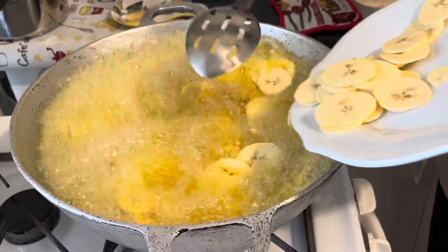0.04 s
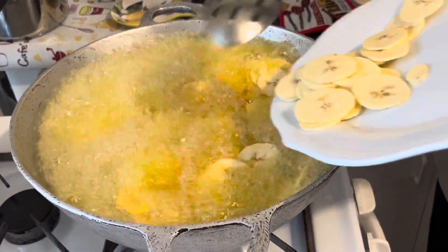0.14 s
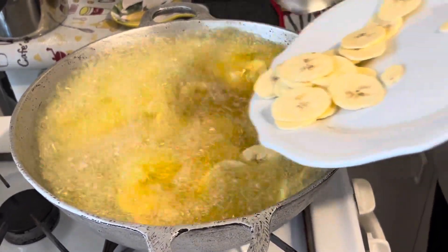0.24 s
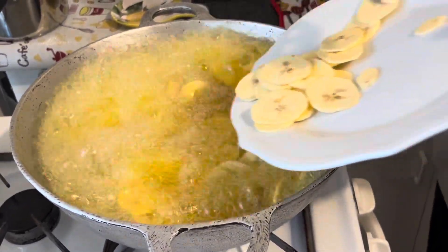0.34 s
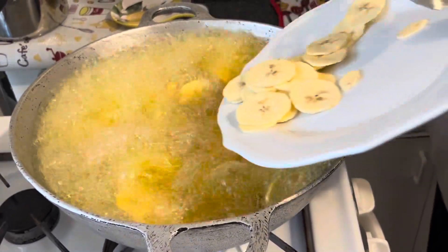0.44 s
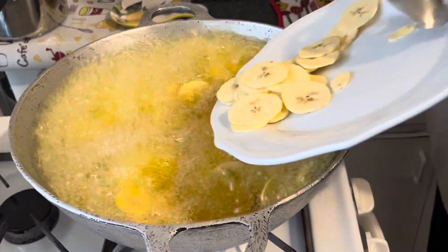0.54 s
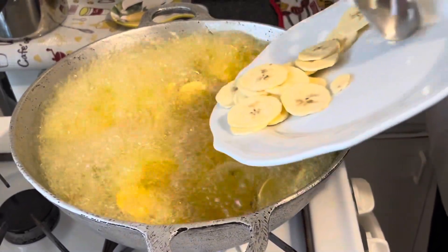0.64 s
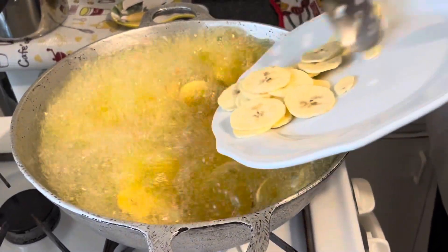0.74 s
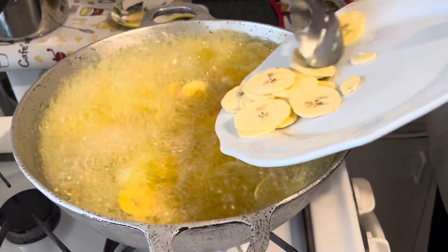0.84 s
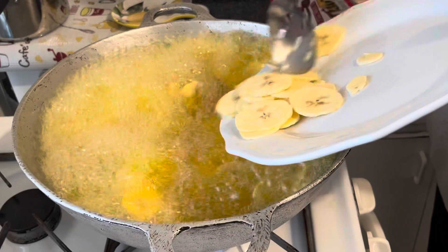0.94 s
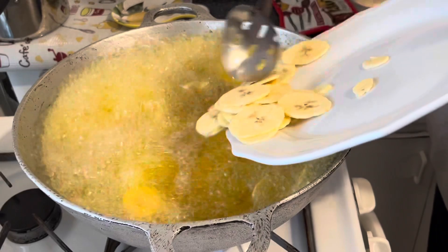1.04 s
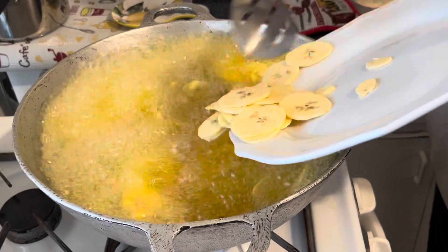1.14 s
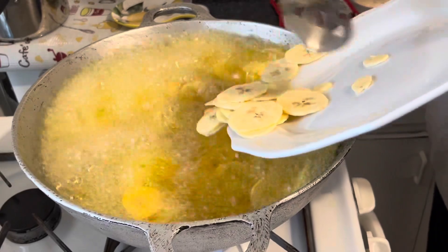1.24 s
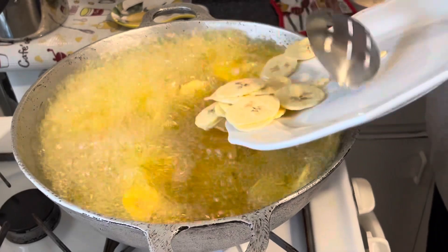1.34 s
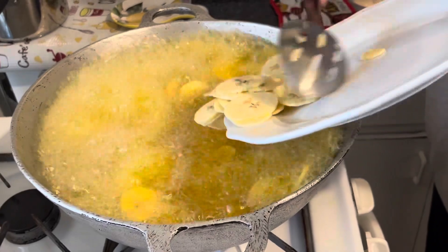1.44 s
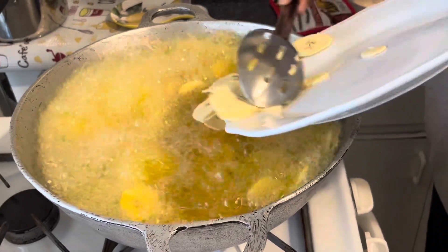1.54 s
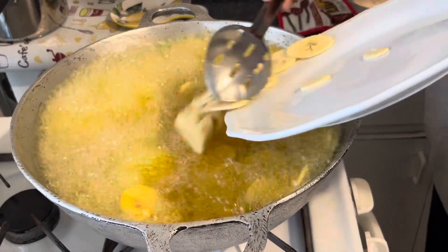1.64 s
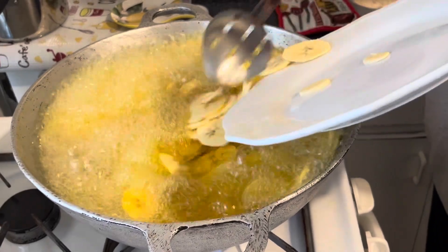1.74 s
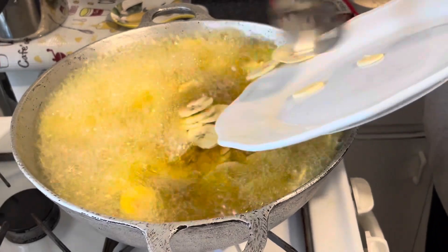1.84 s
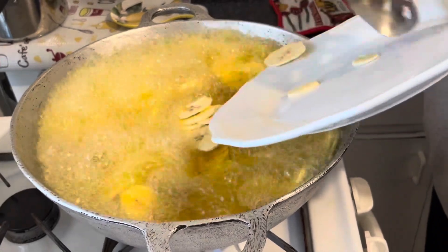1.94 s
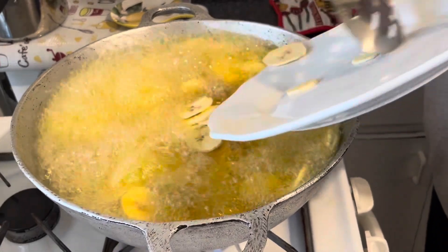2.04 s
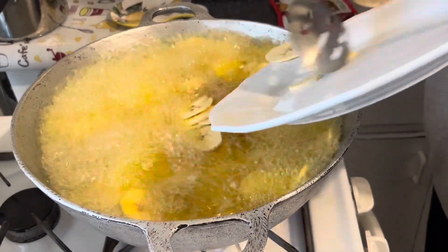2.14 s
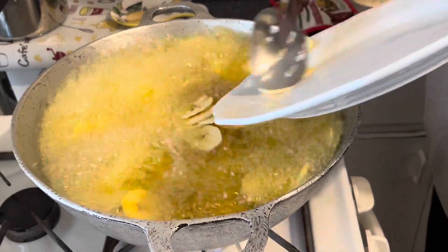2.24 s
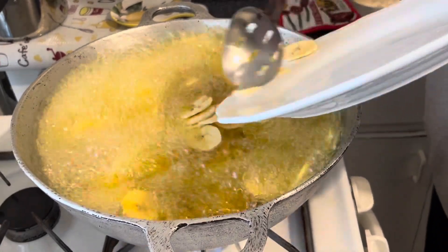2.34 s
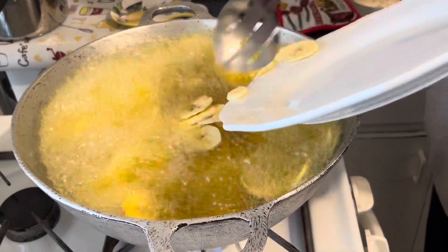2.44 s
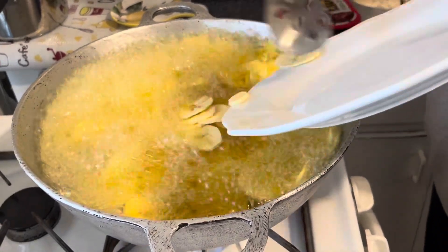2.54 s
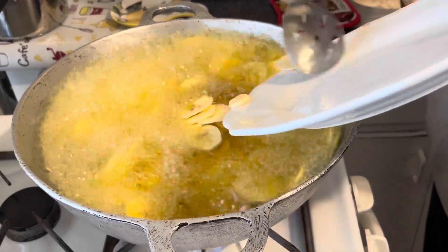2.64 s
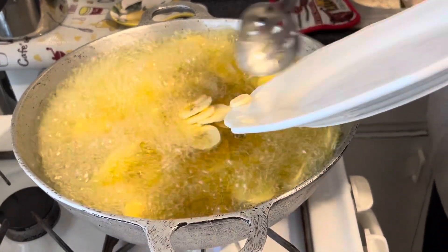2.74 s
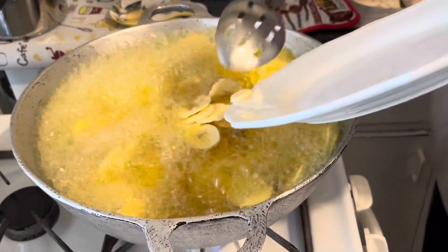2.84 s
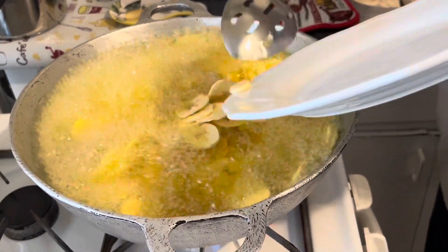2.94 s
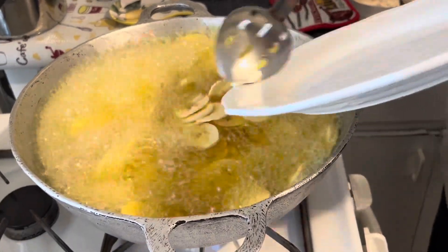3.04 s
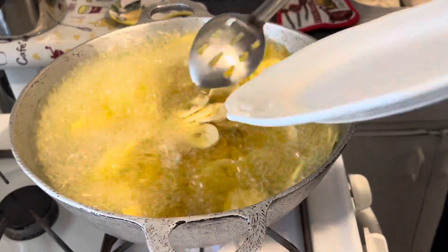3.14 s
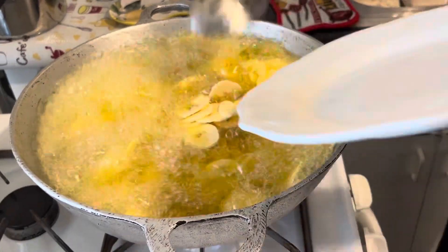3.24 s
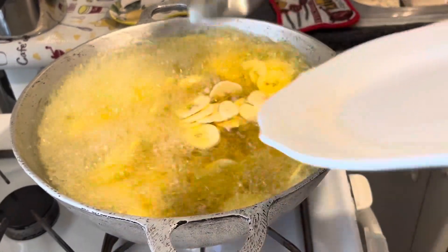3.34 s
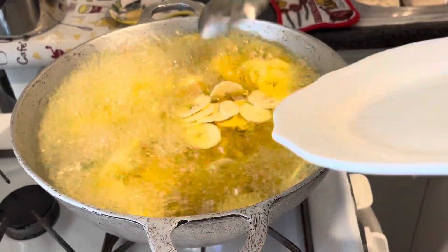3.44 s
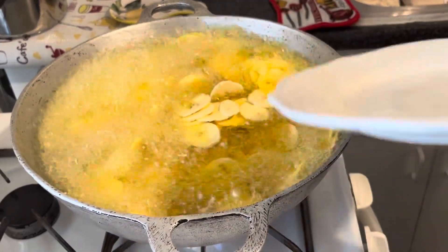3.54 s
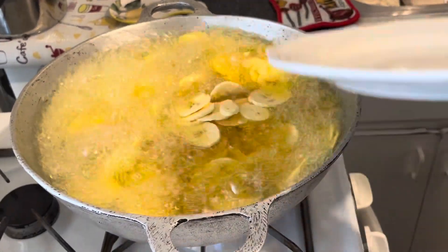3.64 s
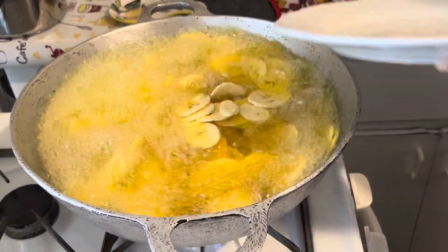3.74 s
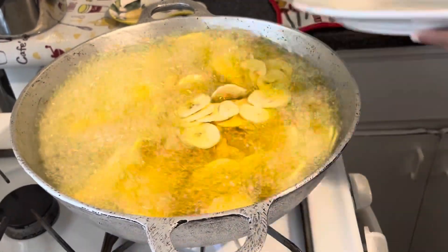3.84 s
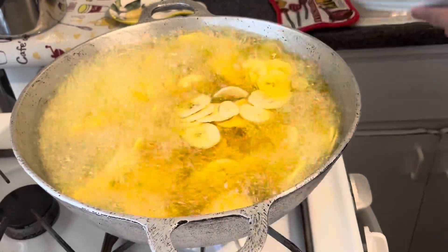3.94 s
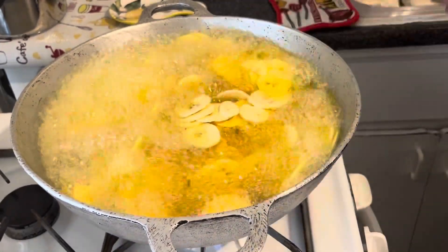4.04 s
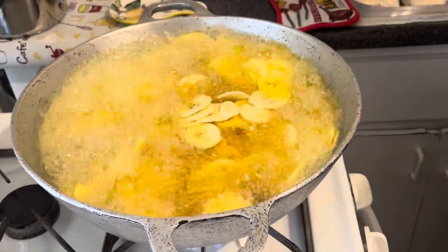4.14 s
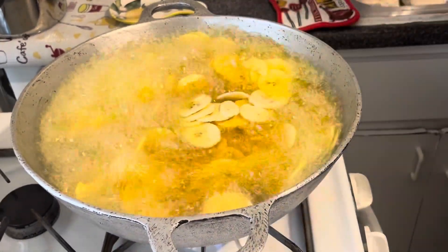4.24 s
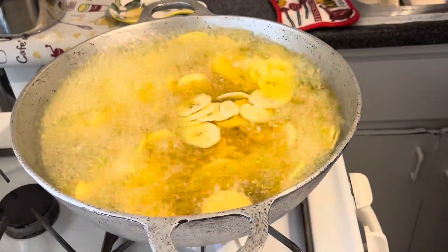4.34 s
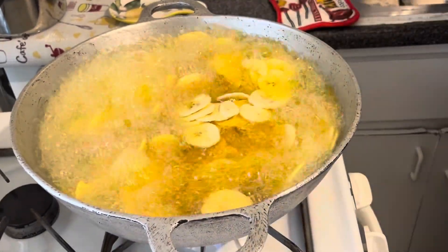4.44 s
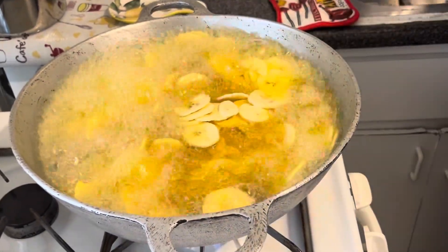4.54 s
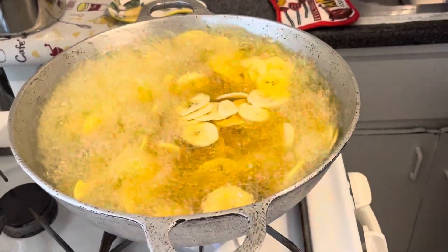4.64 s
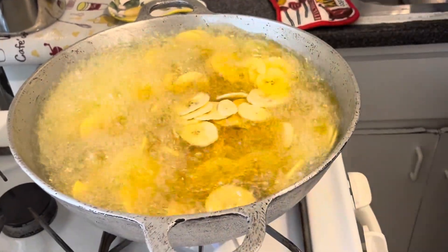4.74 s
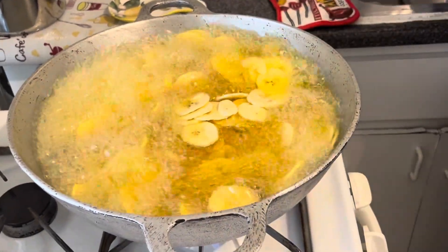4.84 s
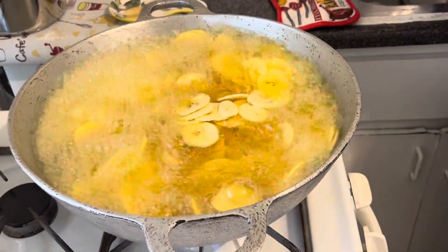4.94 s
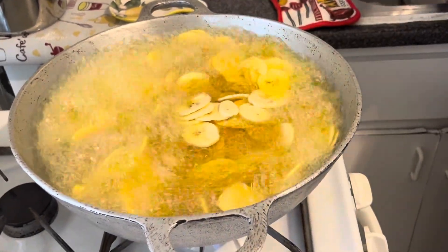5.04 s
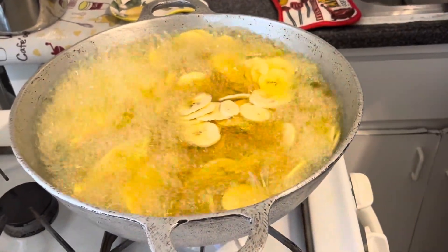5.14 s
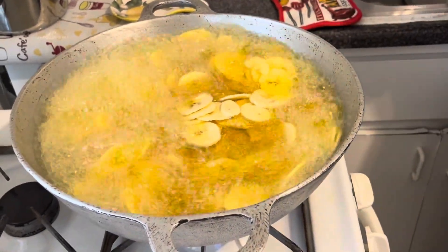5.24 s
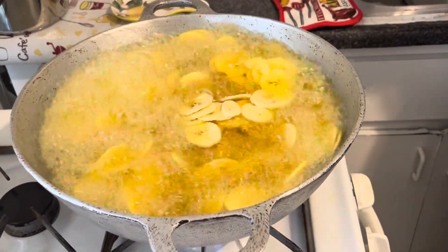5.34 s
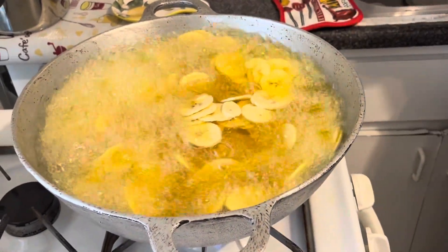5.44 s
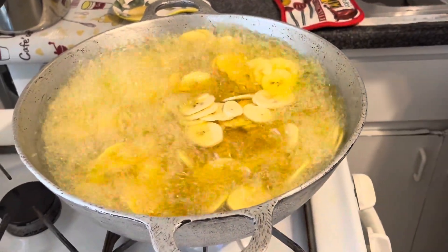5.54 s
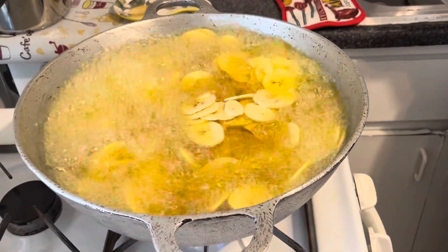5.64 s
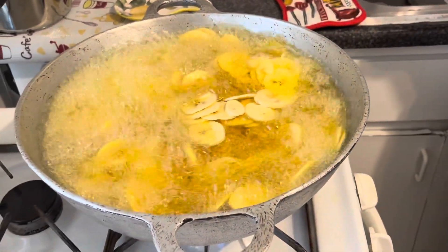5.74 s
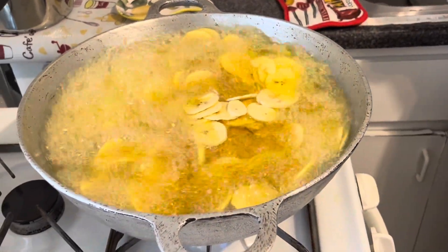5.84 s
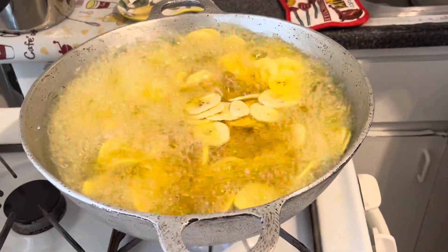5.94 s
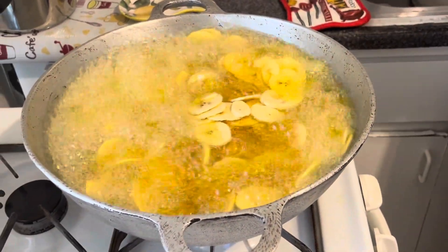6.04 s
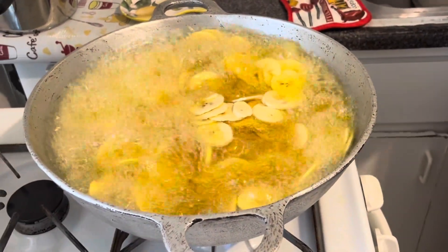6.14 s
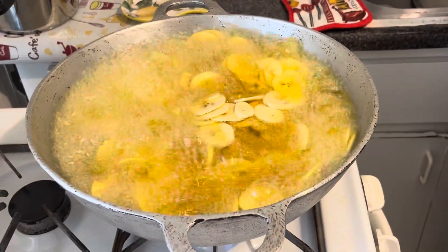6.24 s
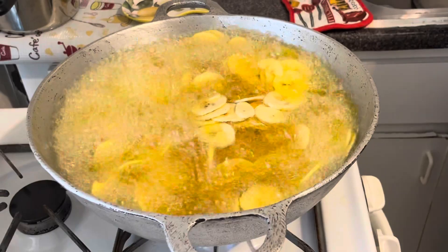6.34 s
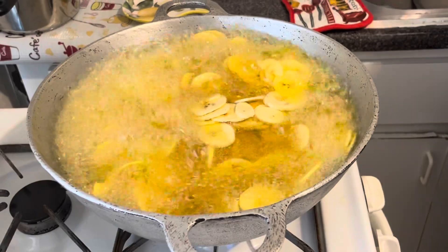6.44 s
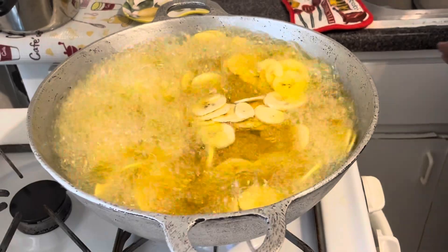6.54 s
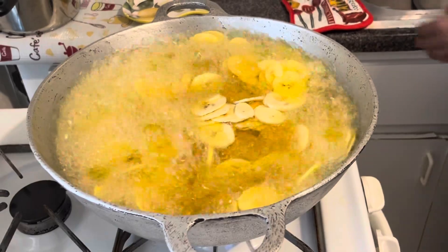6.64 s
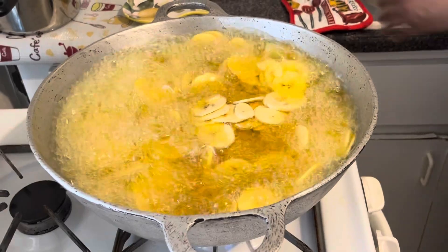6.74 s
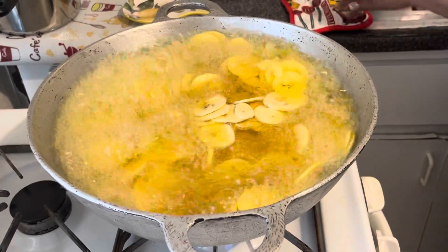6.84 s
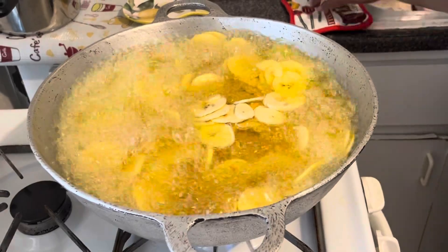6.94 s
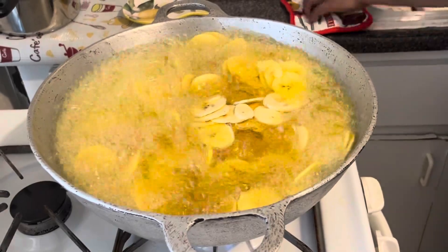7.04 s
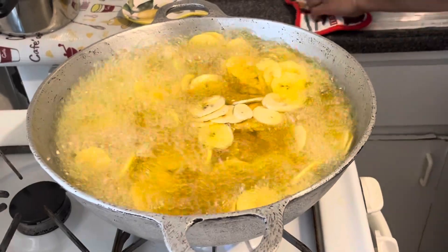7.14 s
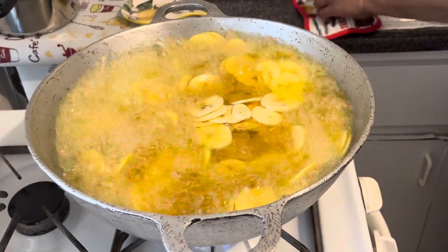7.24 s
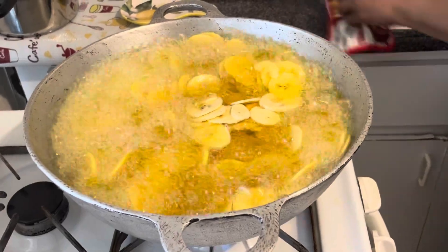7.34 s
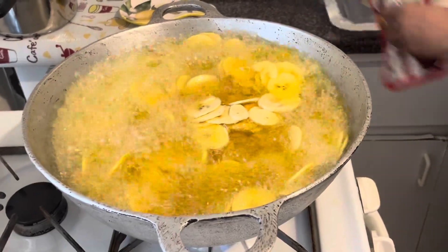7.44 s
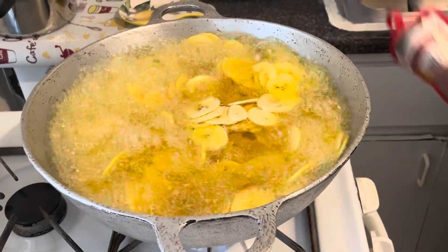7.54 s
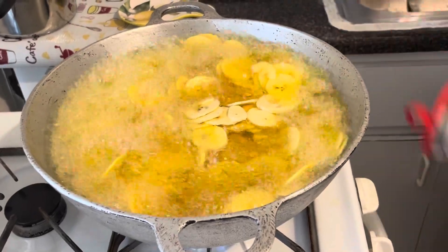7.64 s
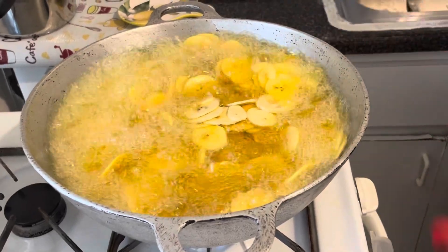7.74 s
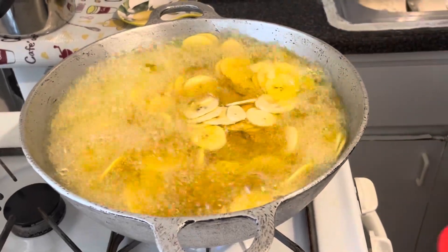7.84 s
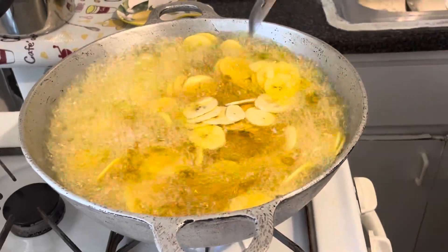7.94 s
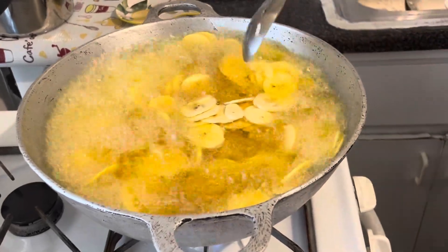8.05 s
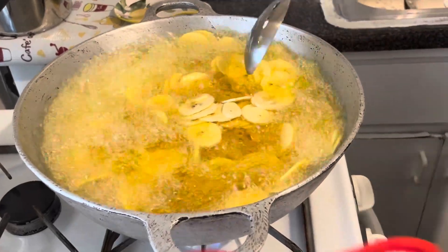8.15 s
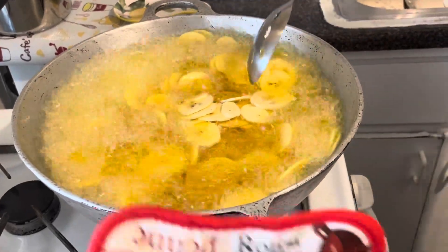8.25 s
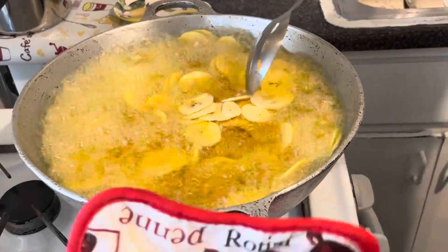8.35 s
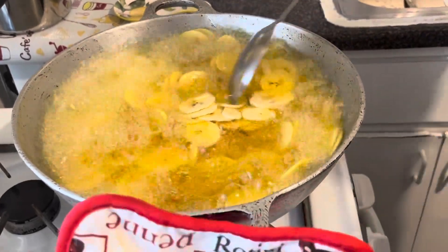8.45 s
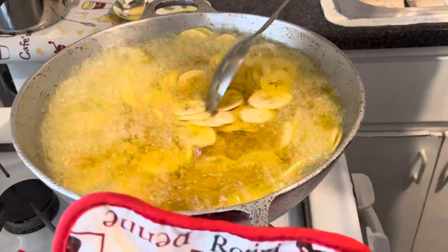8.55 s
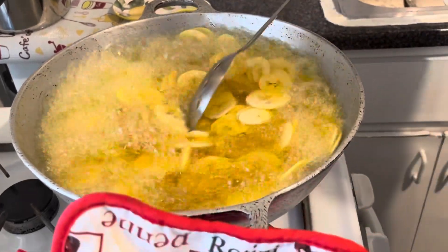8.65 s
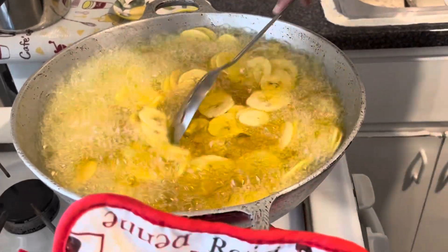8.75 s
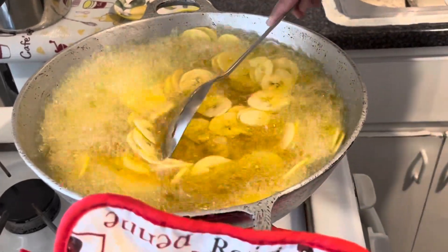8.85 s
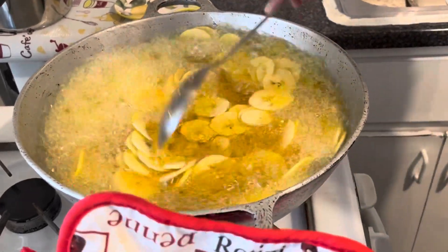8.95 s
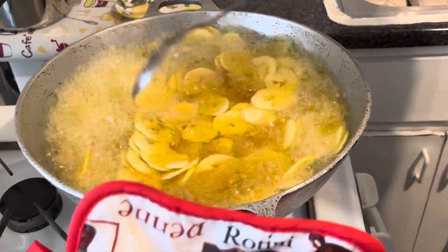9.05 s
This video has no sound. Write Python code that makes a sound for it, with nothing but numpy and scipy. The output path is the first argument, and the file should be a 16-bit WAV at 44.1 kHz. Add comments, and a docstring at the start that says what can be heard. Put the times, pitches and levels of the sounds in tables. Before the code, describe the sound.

Close in a small kitchen, plantain slices fry with a constant fine fizz and gurgling bubbles over a faint hum. A steel spoon strikes and scrapes a china plate several times in the first three seconds. Around five seconds the plate clatters onto a booming counter and slides; then a sharp hollow knock rattles with soft thuds. The frying carries on with scattered popping bubbles. Close stereo, short room tail.

```python
"""Plantain slices deep-fry in a wide pan: tiny bursts of steam fizz, larger bubbles gurgle, a kitchen hums low.
In the first three seconds a steel spoon taps and scrapes a china plate; both ring as damped modes.
At five seconds the plate clatters down: noisy chatter, ringing crockery and a booming counter top.
After six seconds a hollow knock rattles among soft thuds, and the frying sizzles on to the end.
A small room adds a short tail, and a close pair of microphone ports picks it all up in stereo."""
import sys
import numpy as np
from scipy import signal
from scipy.fft import rfft, irfft, next_fast_len
from scipy.io import wavfile
from scipy.ndimage import uniform_filter1d

SR = 44100
rng = np.random.default_rng(int(sys.argv[2]) if len(sys.argv) > 2 else 0)


def generate_wav(signal):
    """Clip the signal to [-1, 1] and save it as 16-bit WAV at the path in sys.argv[1]."""
    frames = np.transpose(np.atleast_2d(signal))
    scaled = np.clip(frames, -1, 1) * 32767
    pcm = np.round(scaled).astype(np.int16)
    wavfile.write(sys.argv[1], SR, pcm)


N = 401751
TIME = np.arange(N) / SR
RING = TIME[:int(.5 * SR)]  # time axis of one blow, s
TOP_HZ = 15900  # upper limit of the sound


def undb(db):
    """Decibels to gain."""
    return 10 ** (np.asarray(db) / 20)


def unit(x):
    """Scale to rms 1."""
    return x / np.sqrt(np.mean(x ** 2))


def along(points, hz):
    """Read (Hz, value) points on a log-frequency axis."""
    f, value = np.transpose(points)
    return np.interp(np.log(hz + 1), np.log(f), value)


def colour(x, points, tilt_db=0):
    """Give a sound a spectrum, tilted by some dB an octave above 400 Hz; rms 1."""
    size = next_fast_len(len(x))
    hz = np.fft.rfftfreq(size, 1 / SR)
    octaves = np.log2(np.maximum(hz, 400) / 1000)
    gain = undb(along(points, hz) + tilt_db * octaves)
    return unit(irfft(rfft(x, size) * gain, size)[:len(x)])


def noise():
    """White noise as long as one blow."""
    return rng.standard_normal(len(RING))


def fade(t60):
    """Exponential decay by 60 dB in t60 seconds."""
    return np.exp(-np.log(1000) * RING / max(t60, 1e-3))


def ring(modes, scatter_db=0, detune=0):
    """Damped sines of (Hz, t60, dB) modes, alternating in sign; each blow may weight and detune them."""
    out = 0
    draws = rng.standard_normal((len(modes), 2))
    for k, ((hz, t60, db), (weight, shift)) in enumerate(zip(modes, draws)):
        tone = np.sin(2 * np.pi * hz * (1 + detune * shift) * RING)
        out = out + (-1) ** k * undb(db + scatter_db * weight) * fade(t60) * tone
    return out


def add(track, s, sound):
    """Mix a sound into a track at a time."""
    i = int(s * SR)
    track[i:i + len(sound)] += sound[:N - i]


def walk(rate, size=N):
    """Smooth random wandering of a given length, rms 1."""
    k = int(SR / rate)
    steps = np.repeat(rng.standard_normal(size // k + 1), k)
    return unit(uniform_filter1d(steps, k)[:size])


# Level of the background (frying and hum) over time. Each row: time in seconds, level in dB.
BACKGROUND_LEVEL = [(0, -46.5), (1.3, -45.5), (1.45, -52), (1.95, -49.5), (2.35, -53), (4.9, -52),
                    (6.9, -48.5), (9.1, -47)]


def background_db(s):
    """The background's level at a time."""
    return np.interp(s, *np.transpose(BACKGROUND_LEVEL))


# Steady tones of the kitchen. Each row: pitch in Hz, rate of wander in Hz, level in dB against the background.
HUM = [(355.6, 11, -12), (476, 9, -12)]


def kitchen_hum(waver=0.23):
    """Sine tones wander in phase and waver in strength."""
    out = 0
    for hz, width, db in HUM:
        strength = 1 + waver * walk(2 * width)
        out = out + undb(db) * strength * np.sin(2 * np.pi * hz * TIME + walk(width))
    return out


def bubble(hz, cycles, glide=0.047):
    """A steam bubble rings for a few cycles and rises in pitch as it reaches the surface."""
    age = np.arange(int(cycles * SR / hz) + 2) * hz / (cycles * SR)
    return np.exp(-np.log(100) * age) * np.sin(2 * np.pi * cycles * age * (1 + glide * age / 2))


def swarm(count, low_hz, high_hz, cycles, spread_db, size=240):
    """Bubbles of many pitches burst at random; positive spread: many weak, few strong; negative: the reverse."""
    out = np.zeros(N)
    bursts = [bubble(hz, cycles) for hz in np.geomspace(low_hz, high_hz, size)]
    when, pitch, strength = rng.random((count, 3)).T
    louds = undb(-spread_db * np.log(np.maximum(1 - strength, 20 / count)))
    for s, k, loud in zip(when * N / SR, (pitch * size).astype(int), louds):
        add(out, s, loud * bursts[k])
    return out


# Spectrum of the fine fizz. Each row: frequency in Hz, level in dB.
FIZZ = [(30, 0), (60, 5.5), (110, -3.5), (330, 1), (560, -12.5), (850, -1), (1500, -9), (2500, -7.5),
        (4500, -8), (6500, -10), (9000, -14), (12000, -12.5), (14200, -16), (15500, -38)]


def fizz(flicker_db=0.92, crackle_db=-2):
    """Countless tiny bursts merge with noise into a flickering fizz."""
    crackle = unit(swarm(count=14000, low_hz=2340, high_hz=12900, cycles=0.98, spread_db=-1.5))
    bed = rng.standard_normal(N) + undb(crackle_db) * crackle
    return colour(bed, FIZZ) * undb(flicker_db * walk(20))


# Spectrum of the larger bubbles. Each row: frequency in Hz, level in dB.
BUBBLING = [(200, -19), (550, 1.5), (850, 2), (1800, 8.5), (2800, 6.5), (5000, -14), (9000, -30)]
# bubbles against the fizz at the start; they thin out as the slices lose their water
BUBBLES_DB, DRYING_DB_PER_S = -2, 0.5


def gurgle(surge_db=-0.1):
    """Larger bubbles ring longer and lower, and slowly weaken."""
    bubbles = colour(swarm(count=14000, low_hz=480, high_hz=4160, cycles=24.0, spread_db=2.5), BUBBLING)
    return undb(BUBBLES_DB - DRYING_DB_PER_S * TIME + surge_db * walk(4.2)) * bubbles


def background():
    """Fizz, gurgle and hum share one level curve."""
    return undb(background_db(TIME)) * (fizz() + gurgle() + kitchen_hum())


# The loudest steam pockets. Each row: start in seconds, level in dB, pitch in Hz.
PLOPS = [(0.099, -24.5, 1750), (0.258, -25.5, 1350), (0.939, -25.5, 2400), (3.99, -34.5, 1880),
         (4.081, -29.5, 3500), (6.833, -34, 1080), (7.155, -30, 5230), (7.515, -31.5, 2340),
         (7.858, -27, 2100), (8.341, -27.5, 1360), (8.425, -33, 3400), (8.749, -28.5, 1500),
         (8.928, -34, 1420), (9.014, -33, 1250), (9.07, -34, 1900)]
POCKET_CYCLES = 7.3  # how long a pocket rings
# lesser pockets: level against the background, spread of level, middle pitch, spread of pitch
POCKET_DB, POCKET_SPREAD_DB, POCKET_HZ, POCKET_OCTAVES = 5, 2, 1450, 0.45
# droplets: level against their pocket, spread of delay, widest pitch offset
SPRAY_DB, SPRAY_S, SPRAY_MAX_OCTAVES = -7.5, 0.014, 0.96


def plops(count=22, droplets=3):
    """Big steam pockets burst in a small spray; lesser ones come at random."""
    out = np.zeros(N)
    for s, db, hz in PLOPS:
        add(out, s, undb(db) * bubble(hz, POCKET_CYCLES))
        for late, pitch in rng.standard_normal((droplets, 2)):
            droplet = bubble(hz * 2 ** (SPRAY_MAX_OCTAVES * np.tanh(pitch)), POCKET_CYCLES / 2)
            add(out, s + SPRAY_S * abs(late), undb(db + SPRAY_DB) * droplet)
    for s, (strength, pitch) in zip(rng.random(count) * N / SR, rng.standard_normal((count, 2))):
        db = background_db(s) + POCKET_DB + POCKET_SPREAD_DB * strength
        add(out, s, undb(db) * bubble(POCKET_HZ * 2 ** (POCKET_OCTAVES * pitch), POCKET_CYCLES))
    return out


# Things pushed along the counter. Each row: start in seconds, length in seconds, level in dB.
SLIDES = [(5.036, 0.69, -41), (5.8, 0.67, -50), (6.306, 0.24, -44.5)]
SLIDE_ATTACK_S, SLIDE_RELEASE_DB_PER_S = 0.013, 54


def slide_db(s):
    """Level of the sliding: each push builds up, holds and dies away; the strongest counts."""
    pushes = []
    for start, length, db in SLIDES:
        release_db = SLIDE_RELEASE_DB_PER_S * np.maximum(s - start - length, 0)
        pushes.append(undb(db - release_db) * np.clip((s - start) / SLIDE_ATTACK_S, 0, 1))
    return 20 * np.log10(np.max(pushes, axis=0) + 1e-9)


# Spectrum of the sliding. Each row: frequency in Hz, level in dB.
GRATING = [(35, -7), (55, 11), (95, 1), (125, 0.5), (155, 7), (200, -20), (280, -7.5), (420, -6.5),
           (850, -6), (1300, -10.5), (1900, -11.5), (3000, -24.5), (8000, -38)]


def sliding(judder_db=7.5):
    """Coloured noise sticks and slips unevenly along the counter."""
    level_db = slide_db(TIME) + judder_db * np.tanh(walk(45))
    return undb(level_db) * colour(rng.standard_normal(N), GRATING)


# depth in dB and rate of the grains in chatter and rattle
GRAIN_DB, GRAINS_PER_S = 5, 400


def grainy_noise():
    """Noise whose level jumps about like many small contacts."""
    return noise() * undb(GRAIN_DB * walk(GRAINS_PER_S, size=len(RING)))


# Spectrum of a hard crack. Each row: frequency in Hz, level in dB.
CRACK = [(100, -21), (700, -11.5), (1300, -7), (2300, 9), (4500, 4), (7000, 1.5), (11000, -9), (15500, -16)]


def crack(t60, tilt_db=0):
    """A decaying burst of bright noise."""
    return colour(noise(), CRACK, tilt_db) * fade(t60)


# Hollow knocks. Each row: start in seconds, level in dB.
KNOCKS = [(6.040, -34.5), (6.284, -35), (6.329, -34), (6.356, -9.5), (6.3625, -11), (6.467, -31),
          (6.484, -33), (6.514, -36), (6.592, -32.5)]
# Resonances of the hollow thing. Each row: pitch in Hz, t60 in seconds, level in dB.
HOLLOW = [(700, 0.043, -4), (760, 0.042, 2.5), (895, 0.14, -13), (1096, 0.026, -16), (1185, 0.079, -16.5),
          (1335, 0.13, -21), (1903, 0.07, -25)]
# Spectrum of its loose rattle. Each row: frequency in Hz, level in dB.
HOLLOW_RATTLE = [(100, -6), (550, -10), (880, 6.5), (1050, -4), (1350, -2), (1550, -13), (1880, -5),
                 (2200, -16), (2900, -13.5), (5000, -23.5), (15000, -35)]
# Padded contacts. Each row: start in seconds, level in dB, pitch ratio.
THUDS = [(5.203, -28, 1.12), (6.358, -25.5, 0.89), (6.430, -26.5, 1.07), (6.481, -32, 0.87),
         (6.537, -39.5, 0.965), (6.595, -43, 1), (6.657, -45, 0.9)]
# What rings in a thud. Each row: pitch in Hz before the ratio, t60 in seconds, level in dB.
THUD = [(70, .25, -11), (112, 0.15, -4.5), (155.4, 0.37, -4.5), (220, 0.12, -2.5), (269.7, 0.28, -6),
        (326, 0.071, -3), (408, 0.075, -5.5)]


def knock(crack_db=-20, rattle_db=-17, rattle_t60=0.31, thud_rise_s=0.0025):
    """Something hollow rings, cracks and rattles on the counter; padded contacts only thud."""
    out = np.zeros(N)
    for s, db in KNOCKS:
        click = undb(crack_db) * crack(0.066, tilt_db=4.0)
        rattle = undb(rattle_db) * colour(grainy_noise(), HOLLOW_RATTLE) * fade(rattle_t60)
        add(out, s, undb(db) * (ring(HOLLOW, scatter_db=1.0) + click + rattle))
    for s, db, pitch in THUDS:
        body = ring([(hz * pitch, t60, mode_db) for hz, t60, mode_db in THUD], scatter_db=2.0)
        add(out, s, undb(db) * body * (1 - np.exp(-RING / thud_rise_s)))
    return out


# Low note of rocking crockery. Each row: start in seconds, time until it is stopped in seconds, level in dB.
FREE_RINGS = [(5.03, .06, -36), (5.368, .05, -33), (5.612, 0.093, -28)]


def rocking(hz=549, t60=1.0, rise_s=0.0098, muted_t60=0.058):
    """Between landings the crockery rings freely on one low note, then is muted."""
    out = np.zeros(N)
    for s, free_s, db in FREE_RINGS:
        mute = undb(-60 * np.maximum(RING - free_s, 0) / muted_t60)
        add(out, s, ring([(hz, t60, db)]) * (1 - np.exp(-RING / rise_s)) * mute)
    return out


RATTLE_T60_S, RAGGED_DB = 0.15, 4  # middle decay and unevenness of the lesser overtones


def overtones(count=210):
    """The many lesser modes of the crockery, spaced ever wider up the range."""
    place, weight, length = rng.random((count, 3)).T
    hz = TOP_HZ * ((np.arange(count) + place + count / 6) / (count * 7 / 6)) ** 2
    t60 = RATTLE_T60_S * (.5 + length)
    db = RAGGED_DB * (2 * weight - 1) + 5 * np.log10(hz)
    return ring(np.transpose([hz, t60, db]))


# Resonances of the counter top. Each row: pitch in Hz, t60 in seconds, level in dB.
COUNTER = [(55.3, 0.3, -9), (76, 0.13, 0.5), (101.6, 0.12, -1), (150.5, 0.22, -8), (192, 0.041, -5),
           (259, 0.13, -12)]


def boom(contact_s):
    """The counter top booms; a longer contact leaves only the low modes."""
    push = np.hanning(int(contact_s * SR) + 3)
    return signal.fftconvolve(ring(COUNTER), push / push.sum())


# Resonances of the china plate. Each row: pitch in Hz, t60 in seconds,
# then level in dB when struck in the well, on the slope and on the rim.
PLATE = [(694, 0.13, -31, -30, -50), (1531.6, 0.26, -26, -27, -45), (2143, 0.25, -17.5, -1.5, 4),
         (2470, 0.48, -5.5, -17.5, -27), (3243, 0.21, -32, -10, -2.5), (3340, 0.66, -41, -25, -14.5),
         (3592, 0.087, 2.5, -8.5, -40), (4770, 0.096, -5, -27, -10), (4887, 0.11, -4, -13.5, -14),
         (4945, 0.12, -37, 2, -10.5), (5530, 0.12, -29, -27, -29), (6016, 0.069, -4, -17, -8),
         (6060, 0.09, -30, -13, -8.5), (6250, 0.1, -20.5, -5, -18), (7190, 0.13, -20, -10, -11),
         (7700, 0.2, -18, -13, -22), (9080, 0.081, -14, -14, -19), (10800, 0.049, -15, -14, -31),
         (12500, 0.038, -20, -18, -26)]
# flutter of the dying ring: depth, rate, and time it takes to set in
FLUTTER, FLUTTER_PER_S, FLUTTER_ONSET_S = .8, 80, .06


def plate(spot):
    """The place of contact decides which plate modes speak; each flutters as it dies away."""
    depth = FLUTTER * (1 - np.exp(-(RING / FLUTTER_ONSET_S) ** 2))
    out = 0
    for k, (hz, t60, *dbs) in enumerate(PLATE):
        wobble = walk(FLUTTER_PER_S, size=len(RING)) + 1j * walk(FLUTTER_PER_S, size=len(RING))
        tone = np.imag((1 + depth * wobble) * np.exp(2j * np.pi * hz * RING))
        tone = tone / np.sqrt(1 + 2 * depth ** 2)  # flutter leaves the mean power alone
        out = out + (-1) ** k * undb(np.interp(spot, np.arange(3), dbs)) * fade(t60) * tone
    return out


# Plate meeting the counter. Each row: start in seconds, clatter level in dB, hardness as treble tilt in
# dB per octave, boom of the counter in dB, ring of the crockery in dB before a common trim.
BUMPS = [(4.972, -37.5, -4, -50, -34.5), (5.020, -19.5, 2.5, -19, -29.5), (5.135, -39, -2.5, -46, -38),
         (5.16, -34, -5, -45, -35.5), (5.203, -32.5, 1.5, -34, -35.5), (5.238, -31.5, 1.5, -49, -33),
         (5.307, -23.5, 0, -35, -24), (5.361, -22, 1.4, -17, -21), (5.366, -24, -0.5, -25.5, -25),
         (5.443, -28.5, -3.5, -32, -38), (5.479, -33, -2.5, -45, -31), (5.525, -25, 1.5, -32, -37),
         (5.536, -20, 1.5, -10, -28.5), (5.582, -17, -0.1, -9, -25.5), (5.604, -20.5, 0, -27.5, -23.5),
         (5.668, -36, 1.5, -43, -36), (5.725, -39, 1, -36, -39), (5.828, -35, -6.5, -35, -39),
         (5.842, -42, -12, -42, -47), (5.913, -45, -8, -44, -47), (5.956, -60, -13, -34.5, -63),
         (6.101, -41.5, -9, -51, -43.5), (6.203, -42, -2, -38, -45)]
# Spectrum of the clatter. Each row: frequency in Hz, level in dB.
CLATTER = [(60, -2), (250, 9), (430, -2.5), (600, 7), (950, 6), (1500, -3.5), (2500, -1.5), (4000, -7.5),
           (5500, -7.5), (7500, -21), (12000, -28), (15500, -42)]
# Main resonances of the crockery. Each row: pitch in Hz, t60 in seconds, level in dB before the tilt.
CROCKERY = [(552.5, 0.24, -8), (620, 0.24, -18), (765, 0.14, -4), (952, 0.16, -4.5), (1074, 0.082, -6),
            (1246, 0.23, -7.5), (1318, 0.36, -14.5), (1529, 0.17, -13), (1712, 0.32, -10.5),
            (1922, 0.26, -10), (2220, 0.41, -14), (2310, 0.27, -17), (2500, 0.32, -12), (2805, .18, -16),
            (3285, 0.22, -13), (3640, 0.14, -6.5)]
CHATTER_T60_S = 0.053  # how long the surfaces chatter at each bump
HELD_T60_S = .3  # further decay of the plate while it is held
CHINA_DB, CHINA_PER_TILT = -11.5, 3.7  # plate's ring against the clatter; dB gained per step of hardness
# each new grip shifts the overtones and the main resonances by these shares
GRIP_DETUNE, CROCKERY_DETUNE = .035, 0.0129
# a heavier landing presses longer: contact time of a 0 dB boom, its power law, boom delay in contact times
PRESS_S, PRESS_POWER, BOOM_LAG = 0.0209, 0.71, 0.99


def counter(ring_db=-2, rattle_db=-18, chatter_db=-8, rattle_s=0.00037):
    """The plate rattles down among other things and slides; the counter booms under each landing."""
    out, lesser = np.zeros(N), overtones()
    for s, db, tilt_db, boom_db, crockery_db in BUMPS:
        chatter = colour(grainy_noise(), CLATTER, tilt_db) * fade(CHATTER_T60_S)
        gripped = np.interp(RING * (1 + GRIP_DETUNE * rng.standard_normal()), RING, lesser)
        rattle = unit(signal.fftconvolve(chatter, gripped)[:len(RING)])
        clatter = undb(rattle_db) * rattle + undb(chatter_db) * chatter
        modes = [(hz, t60, mode_db + tilt_db * np.log2(hz / 1000)) for hz, t60, mode_db in CROCKERY]
        body = undb(crockery_db + ring_db) * ring(modes, scatter_db=4.0, detune=CROCKERY_DETUNE)
        china = plate(rng.uniform(0, 1.92)) * fade(HELD_T60_S)  # the hand damps the plate
        china = undb(CHINA_DB + CHINA_PER_TILT * tilt_db) * china
        add(out, s, (undb(db) * (clatter + china) + body) * (1 - np.exp(-RING / rattle_s)))
        contact_s = PRESS_S * undb(boom_db) ** PRESS_POWER
        add(out, s + BOOM_LAG * contact_s, undb(boom_db) * boom(contact_s))
    return out + sliding()


# Resonances of the steel spoon. Each row: pitch in Hz, t60 in seconds, level in dB.
SPOON = [(3280, 0.047, -3), (4450, 0.047, 2.5), (4550, 0.012, 6), (4970, .07, -3.5), (6120, .03, -4),
         (7080, 0.13, -11.5), (10000, 0.053, -7.5), (11280, 0.046, -12), (12490, 0.045, -18),
         (13050, 0.04, -13)]
# Spoon striking plate. Each row: start in seconds, plate level in dB, spot (0 well, 1 slope, 2 or more rim),
# spoon against plate in dB, crack against plate in dB, time to the first bounce in seconds.
TAPS = [(0.5129, -11, 0, -10, 3.5, 0.012), (0.6068, -26.5, 0.5, 6, 6, 0.006),
        (1.3502, -17.5, 2.3, -5, 6, 0.015), (2.0142, -10, 1.64, -15, 3.5, 0.0012),
        (2.144, -34.5, 1.57, -17, 0, 0.00088), (2.6594, -10, 0.73, -15, 0.5, 0.00089),
        (3.0731, -9.5, 0.46, -10.5, 2, 0.017)]
CONTACT_S = 0.00027  # rise time of a tap
# each bounce is weaker and sooner than the contact before, and its steel weaker still
BOUNCE_DB, BOUNCE_SHRINK, BOUNCE_STEEL_DB = -6, 0.94, -5
# the spoon settles on the plate and mutes it: when, and the share of the ring that is left
REST_S, MUTED_SHARE = .05, .27


def rebounds(s, gap_s, shrink, count):
    """Times of a contact and the rebounds after it, each gap shorter than the last."""
    return s + np.append(0, np.cumsum(gap_s * shrink ** np.arange(count)))


def spoon_taps(crack_t60=0.024):
    """Steel cracks against china and both ring; the spoon bounces twice and mutes the plate."""
    out = np.zeros(N)
    damping = MUTED_SHARE + (1 - MUTED_SHARE) / (1 + (RING / REST_S) ** 6)
    rise = 1 - np.exp(-RING / CONTACT_S)
    for start, db, spot, spoon_db, crack_db, gap_s in TAPS:
        for k, s in enumerate(rebounds(start, gap_s, BOUNCE_SHRINK, count=2)):
            steel = undb(spoon_db) * ring(SPOON, scatter_db=2.0) + undb(crack_db) * crack(crack_t60)
            blow = plate(spot) * damping + undb(k * BOUNCE_STEEL_DB) * steel
            add(out, s, undb(db + k * BOUNCE_DB) * blow * rise)
    return out


# Spoon dragged over the plate. Each row: start in seconds, length in seconds, level in dB.
SCRAPES = [(0.64, 0.18, -49.5), (0.744, 0.086, -41), (1.333, 0.015, -41.5), (1.423, 0.058, -53),
           (1.478, .09, -56), (2.09, 0.17, -47)]


def spoon_scrapes(grit_db=-3, steel_db=-3):
    """Tiny irregular slips excite the plate's rim and the spoon, with grit on top."""
    out = np.zeros(N)
    rim = (plate(spot=2) + undb(steel_db) * ring(SPOON)) * fade(0.046)
    for s, length, db in SCRAPES:
        slips = noise() ** 3  # cubing makes a few slips stand out
        rub = unit(signal.fftconvolve(slips, rim)[:len(RING)])
        rub = rub + undb(grit_db) * colour(slips, CRACK, tilt_db=-2.5)
        k = int(length * SR)
        add(out, s, undb(db) * rub[-k:] * signal.windows.tukey(k, .5))
    return out


def kitchen(x, wet_db, t60=0.26, gap_s=0.01):
    """Direct sound plus a short tail from tiles and cupboards."""
    tail = noise() * fade(t60) * (RING > gap_s)
    return x + undb(wet_db) * signal.fftconvolve(x, tail / np.linalg.norm(tail))[:N]


# Sideways part of the sound. Each row: frequency in Hz, level in dB.
SIDEWAYS = [(60, -20), (150, -11), (300, -6), (800, -8), (1450, 0.5), (1900, -7), (2400, -19), (15000, -56)]


def scene():
    """Everything meets in the middle; reflections from the side walls widen the lower range."""
    mid = background() + kitchen(plops(), wet_db=-10)
    mid = mid + kitchen(knock(), wet_db=-12.0)
    mid = mid + kitchen(counter() + rocking(), wet_db=-9.5)
    mid = mid + kitchen(spoon_taps() + spoon_scrapes(), wet_db=-10.0)
    walls = noise() * fade(0.36) * (RING > .003)
    hz = np.fft.rfftfreq(len(RING), 1 / SR)
    sideways = rfft(walls / np.linalg.norm(walls)) * undb(along(SIDEWAYS, hz))
    side = signal.fftconvolve(mid, irfft(sideways, len(RING)) * fade(1.6))[:N]
    return np.array([mid + side, mid - side])


# Colour of the two microphone ports. Each row: frequency in Hz, left minus right in dB.
LEAN = [(60, 1.5), (200, 2), (750, 3), (1300, 0), (2150, -4), (2500, 0.3), (4400, -0.64)]
PORT_LAG_S, PORT_LAG_ABOVE_HZ = .000161, 5250
LOW_CUT_HZ, CEILING = 40, 1.0


def record(dry):
    """Ports differ in colour, treble reaches the right one first, rumble is cut and peaks are rounded."""
    size = next_fast_len(N)
    hz = np.fft.rfftfreq(size, 1 / SR)
    lag = 2 * np.pi * PORT_LAG_S * np.maximum(hz - PORT_LAG_ABOVE_HZ, 0)  # phase, radians
    left = undb(along(LEAN, hz) / 2) * np.exp(-1j * lag / 2)
    ports = irfft(rfft(dry, size) * np.array([left, 1 / left]), size)[:, :N]
    ports = signal.sosfilt(signal.butter(4, LOW_CUT_HZ, "high", fs=SR, output="sos"), ports)
    rounded = CEILING * np.tanh(ports / CEILING)
    return signal.sosfilt(signal.ellip(8, .2, 70, TOP_HZ, fs=SR, output="sos"), rounded)


dry = scene()
out = record(dry)
generate_wav(out)
```